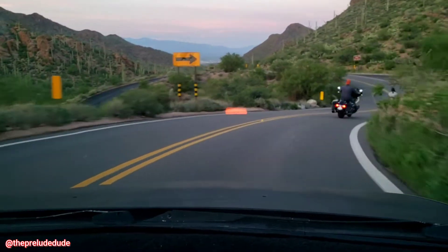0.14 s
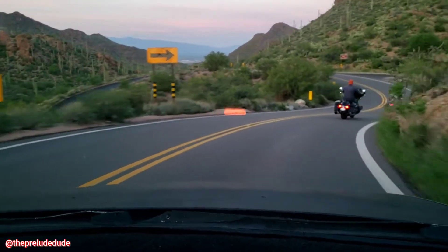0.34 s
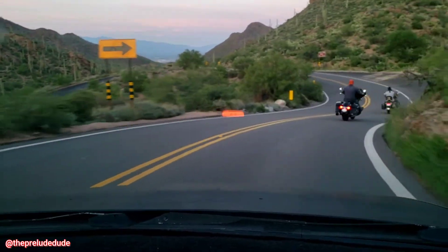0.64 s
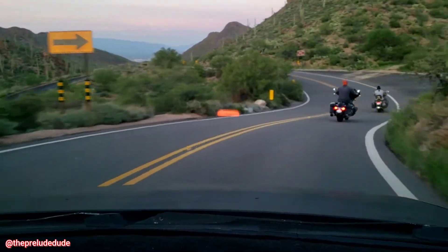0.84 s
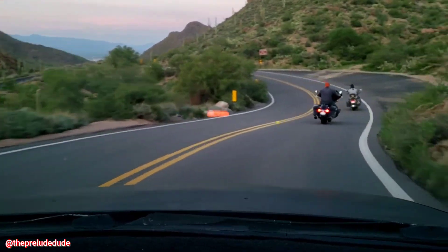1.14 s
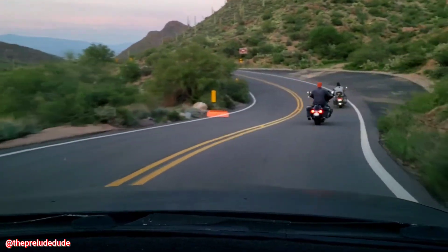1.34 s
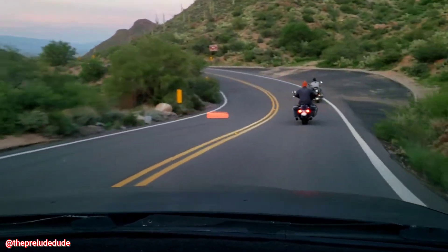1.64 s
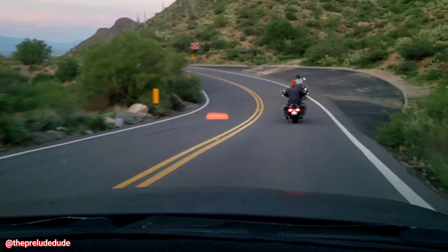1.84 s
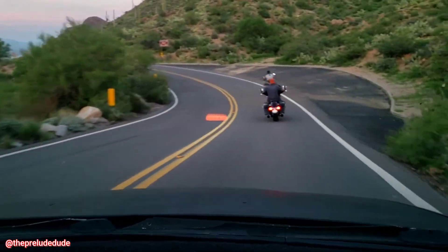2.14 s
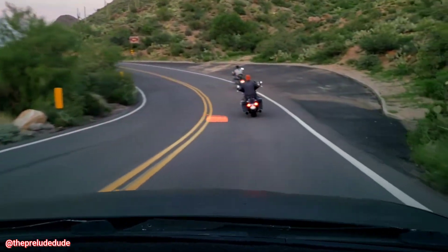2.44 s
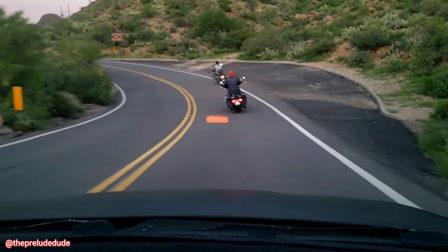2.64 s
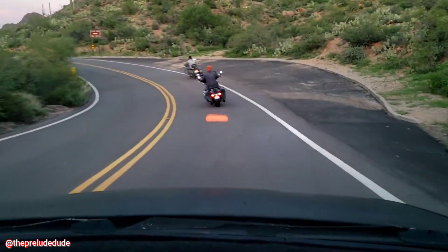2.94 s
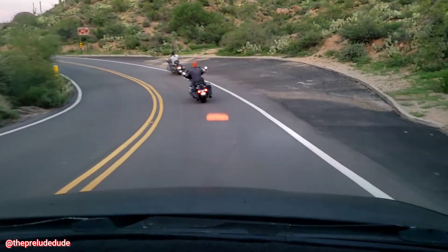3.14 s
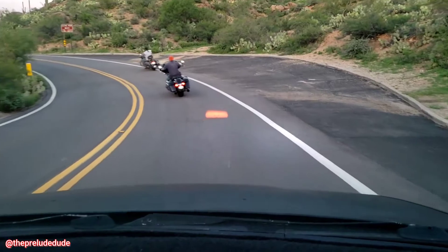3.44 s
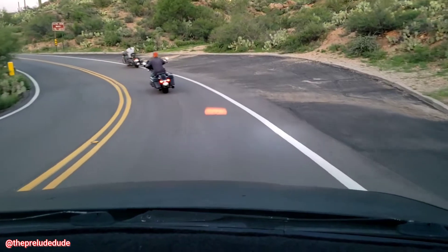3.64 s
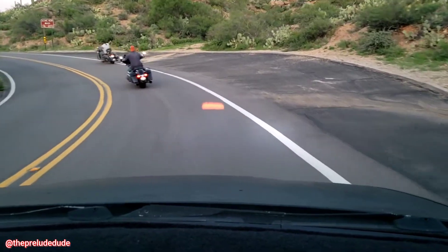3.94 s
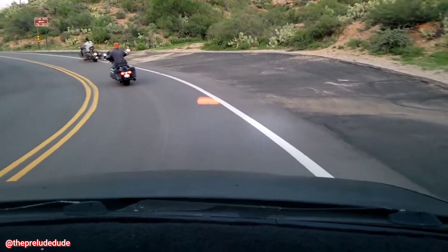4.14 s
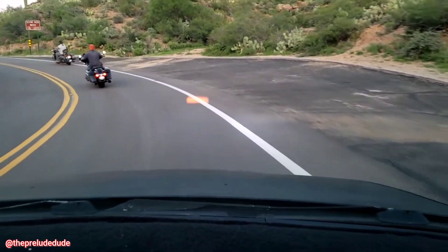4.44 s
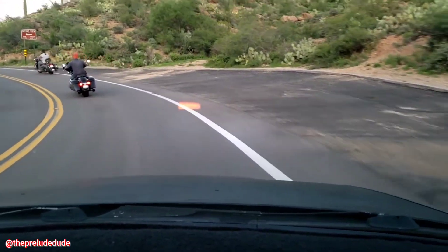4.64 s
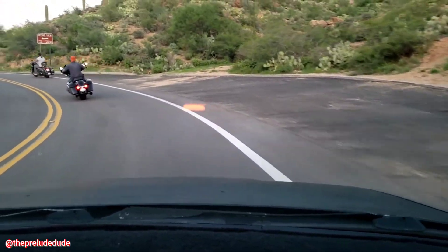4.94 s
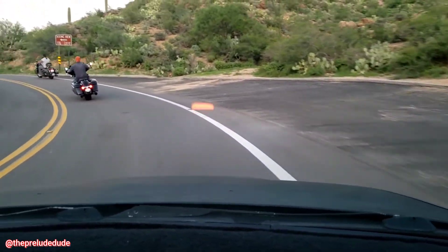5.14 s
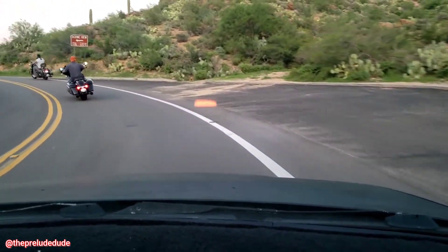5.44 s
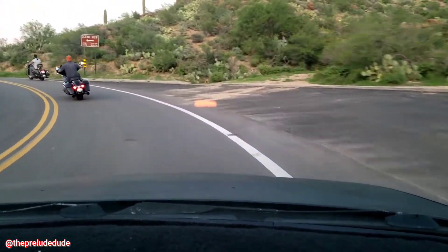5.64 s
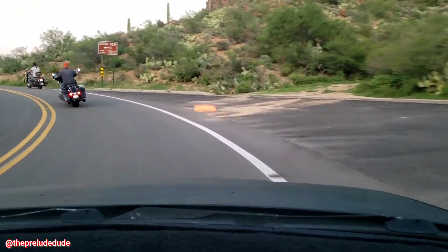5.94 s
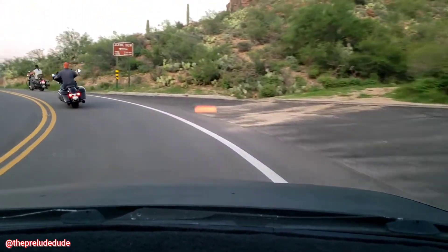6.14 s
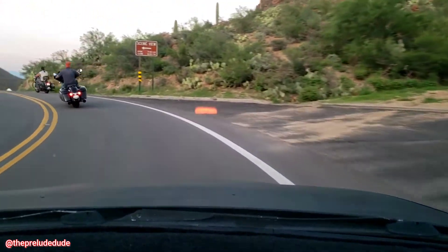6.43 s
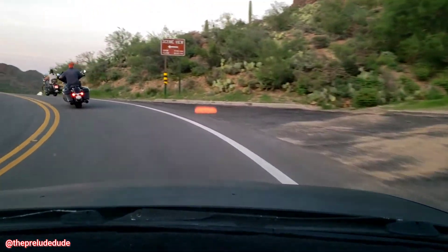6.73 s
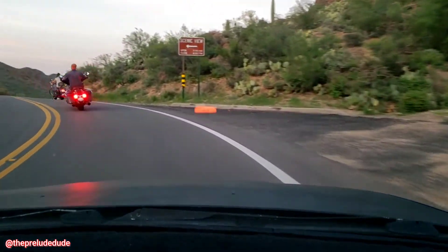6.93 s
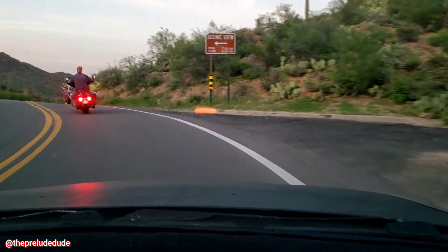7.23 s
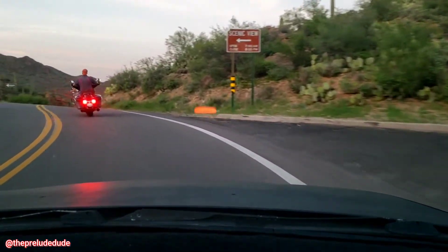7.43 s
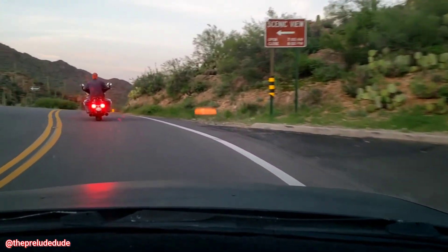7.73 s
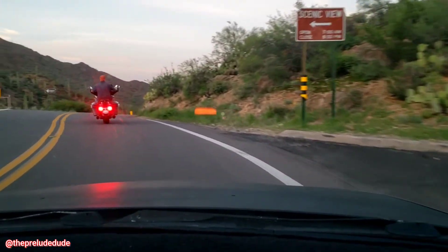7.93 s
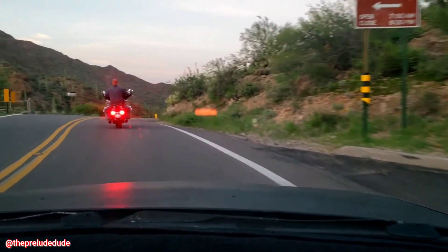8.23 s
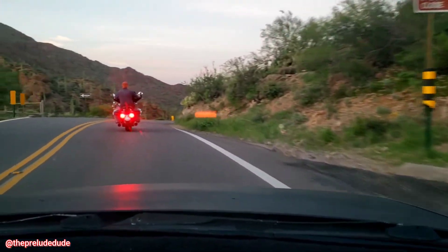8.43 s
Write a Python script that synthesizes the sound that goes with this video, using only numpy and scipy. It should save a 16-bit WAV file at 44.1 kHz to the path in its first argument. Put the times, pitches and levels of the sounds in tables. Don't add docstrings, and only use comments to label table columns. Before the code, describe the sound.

Inside a small car on a winding road, the engine's deep boom sinks in pitch then rises, over tyre rumble, thinning wind hiss and trim ticks.

```python
import sys
import numpy as np
from scipy import signal
from scipy.io import wavfile
from scipy.ndimage import uniform_filter1d, map_coordinates

SR = 44100
rng = np.random.default_rng(int(sys.argv[2]) if len(sys.argv) > 2 else 0)


def boost(x):
    u = np.asarray(x, float) / 20
    return 10 ** u


def wav_out(sig):
    wavfile.write(sys.argv[1], SR, np.round(np.clip(np.atleast_2d(sig).T, -1, 1) * 32767).astype(np.int16))


N = 378372


def curves(table):
    s, *columns = np.transpose(table)
    return [np.interp(np.arange(N) / SR, s, column) for column in columns]


def swells(table):
    t = np.arange(0, N, 32) / SR
    db = 0 * t
    for s, peak_db, length in table:
        db = db + peak_db * np.exp(-((t - s) / length) ** 2)
    return np.interp(np.arange(N) / SR, t, db)


def walk(rate):
    k = int(SR / rate)
    points = rng.standard_normal(N // k + 2)
    line = np.interp(np.arange(N) / k, np.arange(len(points)), points)
    return 1.312 * uniform_filter1d(line, k)


def tone(hz, wobble_hz):
    turns = np.cumsum(hz + wobble_hz * walk(6)) / SR
    return np.sqrt(2) * np.sin(2 * np.pi * (turns + rng.random()))


def band_noise(lo_hz, hi_hz, samples):
    band = signal.butter(2, [lo_hz, hi_hz], "band", fs=SR, output="sos")
    return signal.sosfilt(band, rng.standard_normal(samples))


# (time [s], centre [Hz], level [dB], length
# [s])
HOLLOWS = [(3.55, 14000, -5.5, .2), (3.53, 5500, -1.5, .08), (3.1, 3300, -2, 0.16), (8.42, 5800, -6, .12),
           (8.5, 13500, -8.5, .1), (5.97, 6300, -3, .1), (6.15, 13500, 5, .1), (6.55, 14000, 3, .25),
           (7.2, 16000, -3, .07), (1.37, 2100, 7, 0.11), (4.3, 970, 3, .15), (4.3, 130, 6, .12),
           (3.15, 140, 4.5, .1), (2.2, 310, 2.5, 0.59), (5.4, 305, 5.5, 0.28), (7.85, 200, -3, .08),
           (8.38, 200, -6, .2), (8.4, 160, -4, .12), (7.3, 215, -3, .15), (.12, 52, 6, .1),
           (.95, 36, -5, .25), (3.2, 1800, -3.5, .08), (3.8, 2400, 2.5, .2), (5.3, 290, -4.5, .2),
           (1.75, 210, 4, .2), (2.45, 680, -5, .12), (7.5, 560, 4.5, .12), (7.9, 1500, 3.5, .15),
           (0.54, 5000, 4, 0.13), (7.1, 2300, -2, .2)]


def noise(colour, lo_hz, hi_hz, flicker_db, rate):
    size, overlap, hollow_octaves = 4096, 3072, 0.11
    hz, s, cells = signal.stft(rng.standard_normal(N), SR, nperseg=size, noverlap=overlap)
    hz[0] = 1
    colour_hz, colour_db = np.transpose(colour)
    gain = boost(np.interp(np.log(hz), np.log(colour_hz), colour_db, left=-120, right=-120))
    inside = (hz > lo_hz) & (hz < hi_hz)
    gain /= np.sqrt(2 * np.sum(gain[inside] ** 2) / size)

    grid = np.meshgrid(3 * np.log2(hz), np.minimum(rate * s, 199), indexing="ij")
    db = flicker_db * map_coordinates(rng.standard_normal((50, 200)), grid, order=1)
    for at, centre_hz, hollow_db, length in HOLLOWS:
        octaves = np.log2(hz / centre_hz)[:, None]
        db += hollow_db * np.exp(-(octaves / hollow_octaves) ** 2 - ((s - at) / length) ** 2)
    shaped = cells * gain[:, None] * boost(db)
    return signal.istft(shaped, SR, nperseg=size, noverlap=overlap)[1][:N]


# (time [s], level [dB])
RUSH = [(0, 16.5), (.3, 13), (.66, 11), (.9, 8), (1.35, 6), (1.65, 7.5), (2.1, 5.5), (2.5, 2), (3.05, 0),
        (3.57, -2.5), (4.1, -1.5), (4.6, -1.5), (5.9, 1), (6.3, 1), (6.85, 4.5), (7.3, 4), (7.8, 0.5),
        (8.55, -4)]


def rush(db, share):
    return boost(db + share * curves(RUSH)[0])


# (time [s], level [dB])
CHIRPS = [(4.392, -74), (4.468, -78), (4.706, -72), (4.745, -75), (4.784, -76), (5.072, -72), (5.116, -69),
          (5.152, -73), (5.406, -74), (5.442, -71), (5.481, -68), (5.714, -62), (5.753, -62), (5.792, -65)]


def cricket():
    stroke_s, wing_hz, drop_hz = 0.023, 5000, 330
    x = np.arange(int(stroke_s * SR)) / (stroke_s * SR)
    turns = np.cumsum(wing_hz - drop_hz * x ** 3) / SR
    note = np.sin(np.pi * x) * np.sin(2 * np.pi * turns)
    out = np.zeros(N)
    for s, db in CHIRPS:
        out[int(s * SR):][:len(x)] += boost(db) * note
    return out


# (time [s], firing cycle rate [Hz], level [dB])
BIKE = [
    (1.4, 14, -71),
    (2, 13.2, -61.5),
    (3, 11.4, -59),
    (3.5, 10.7, -57.5),
    (4, 12.6, -57.5),
    (4.4, 12, -52.5),
    (5, 11.65, -51),
    (5.4, 11.1, -51),
    (5.7, 11, -55),
]
BIKE_PARTIALS = {13: -5.5, 15: 0, 18.3: -2.5, 20: -0.4, 30: -12.5, 35: -5}


def motorbike():
    cycle_hz, level_db = curves(BIKE)
    out = np.zeros(N)
    for order, partial_db in BIKE_PARTIALS.items():
        fading = boost(level_db + partial_db + 0.95 * walk(1.4))
        out += fading * tone(order * cycle_hz, wobble_hz=.4)
    return out


# (time [s], peak [dB], low edge #
# [Hz], high edge [Hz])
CLICKS = [(.683, -58, 700, 3000), (1.93, -57, 700, 9000), (3.208, -62.5, 3900, 4700),
          (3.773, -64, 3500, 11500), (4.029, -60, 1800, 5500), (6.203, -62, 700, 3000),
          (6.364, -63, 700, 3000), (7.786, -59.5, 1800, 8500), (7.792, -64, 4000, 6500),
          (.03, -51, 1860, 1950), (5.135, -67, 3500, 7000), (5.188, -66, 4500, 7000),
          (5.238, -68, 5700, 6500), (6.515, -67, 2997, 8000), (6.548, -62, 2000, 6000),
          (6.81, -61, 2000, 7100), (7.147, -60, 2000, 6000), (3.205, -50, 1000, 1700)]


def tick_clicks():
    out, t = np.zeros(N), np.arange(4096) / SR
    for s, db, lo_hz, hi_hz in CLICKS:
        burst = band_noise(lo_hz, hi_hz, len(t))
        decay_s = 0.0037 + 3.6 / (hi_hz - lo_hz)
        shape = np.exp(-t / decay_s) * np.minimum(t / .0005, 1)
        part = out[int(s * SR):][:len(t)]
        part += (boost(db) * burst / burst.std() * shape)[:len(part)]
    return out


# (time [s], peak [dB], ring [Hz], tail [s])
TICKS = [(.683, -60, 1500, .03), (1.93, -62, 2500, .03), (2.75, -70, 12000, 0.027),
         (3.204, -47, 1490, 0.065), (3.206, -56, 2000, .06), (3.213, -62, 3900, .06),
         (3.207, -62, 4200, 0.072), (3.209, -65, 5000, 0.036), (3.24, -64, 4000, .05),
         (3.205, -54, 2500, .05), (3.222, -60, 3750, 0.065), (3.21, -66, 6800, .06),
         (3.208, -67, 8000, 0.08), (1.569, -51, 2700, .03), (3.773, -61.5, 8000, 0.026),
         (4.027, -66, 4000, 0.027), (4.104, -69, 14700, .02), (4.268, -66, 12880, .035),
         (4.345, -71, 12600, .02), (4.42, -63, 12390, .035), (4.421, -65, 13500, .02),
         (4.493, -64, 13500, 0.03), (4.548, -69, 13230, .02), (4.568, -63, 12560, .025),
         (4.772, -59, 9580, 0.024), (4.827, -62, 4220, .03), (4.846, -62, 3800, .05),
         (4.85, -68, 10000, 0.018), (4.939, -62, 4500, 0.06), (5.133, -60, 4284, .04),
         (5.186, -63, 4100, .06), (6.203, -60, 1790, 0.028), (6.364, -60, 1790, 0.023),
         (6.551, -64, 4770, 0.037), (6.684, -54, 4600, 0.039), (6.686, -58, 2500, .05),
         (6.685, -60, 8980, 0.035), (6.81, -58, 4000, 0.063), (6.687, -59, 3550, .05),
         (7.148, -62, 4510, .04), (7.24, -57, 3020, 0.068), (7.355, -58, 2970, .05),
         (7.785, -64, 6500, 0.031), (7.818, -59, 5110, .03), (8.118, -66.5, 8000, 0.048),
         (7.786, -59, 2500, 0.027), (7.791, -51, 3950, 0.025), (7.797, -61, 3700, 0.044)]


def trim():
    out, t = np.zeros(N), np.arange(4096) / SR
    grit_per_s, grit_db, grit_tail_s = 14, -72, .025
    when, size, pitch = rng.random((int(grit_per_s * N / SR), 3)).T
    tails = np.full(len(when), grit_tail_s)
    grit = np.transpose([when * N / SR, grit_db + 7 * size ** 2, 1800 * 7 ** pitch, tails])

    for s, db, hz, tail in [*TICKS, *grit]:
        half_width = min(.11 * hz, 700)
        crack = band_noise(hz - half_width, hz + half_width, len(t))
        tick = 0.81 * crack / crack.std() + 0.37 * np.sin(2 * np.pi * hz * t)
        snap = band_noise(.5 * hz, min(2 * hz, .45 * SR), len(t))
        tick += 1.5 * np.exp(-t / .003) * snap
        fade = np.exp(-np.log(1000) * t / tail) * np.minimum(t / 0.0033, 1)
        part = out[int(s * SR):][:len(t)]
        part += (boost(db) * tick * fade)[:len(part)]

    squeak_s, squeak_hz, squeak_db, length_s = 3.408, 6700, -77, .042
    stick_slip_db = 4 * np.cos(2 * np.pi * 38 * (t - .01))
    arch = np.sin(np.pi * np.clip(t / length_s, 0, 1)) ** .5
    squeak = boost(squeak_db + stick_slip_db) * np.sin(2 * np.pi * squeak_hz * t) * arch
    out[int(squeak_s * SR):][:len(t)] += squeak
    return out


# (frequency [Hz], density [dB per Hz])
ROAR = [(120, -11), (200, -6), (260, 7), (310, 4.5), (410, 2.5), (480, -2.5), (600, -2.5), (700, -7.5),
        (920, -9.5), (1000, -14.5), (1500, -15.5), (2000, -21.5), (2300, -34.5), (3500, -37.5)]
WIND = [(900, -3.5), (1500, -2), (2100, -2.5), (2500, -4), (3200, -7.5), (3450, -6.5), (3620, -5),
        (3800, -8), (4100, -7.5), (4400, -10.5), (5100, -11.5), (5600, -15.5), (7000, -18.5), (9000, -23)]
HIGH_HISS = [(5000, -16.5), (7000, -6.5), (7500, -1.5), (10000, -1), (12400, -2.5), (13200, -9), (14500, -31)]
TOP_HISS = [(11000, -23.5), (12600, -7), (13200, 2), (15400, 3.5), (15900, 1.5)]
# (time [s], level [dB], length [s])
PUFFS = [
    (.31, -1, 0.034),
    (2.073, -1.5, .15),
    (2.76, 6, 0.089),
    (3.4, 1, .1),
    (3.6, -2.5, 0.13),
    (3.9, 0.5, 0.083),
    (6.3, 4, 0.13),
    (6.9, 2, 0.18),
    (7.284, 4, 0.13),
    (8.5, 0, 0.12),
]
# (time [s], level [dB], length [s])
LULLS = [
    (.95, 0, 0.12),
    (3.0, -1, 0.086),
    (3.45, -2.5, 0.14),
    (5.15, 2, .1),
    (5.4, -1.5, .07),
    (7.0, -2.5, 0.061),
    (7.5, 0, .1),
    (8.05, 1, 0.095),
    (8.4, -2, 0.12),
]


def roar_and_wind():
    gust = boost(.6 * walk(16) + .25 * walk(7))
    puff_db, lull_db = swells(PUFFS), swells(LULLS)
    roar = noise(ROAR, 646, 1500, flicker_db=1.24, rate=7)
    roar *= rush(-57.5, share=.45) * boost(0.37 * walk(7.4) + .6 * lull_db)
    wind = noise(WIND, 2130, 5200, flicker_db=1.17, rate=13)
    wind *= rush(-68.5, share=.85) * boost(lull_db)
    high_hiss = noise(HIGH_HISS, 7500, 12000, flicker_db=2.0, rate=12)
    high_hiss *= rush(-75, share=.9) * boost(.4 * puff_db)
    top_hiss = noise(TOP_HISS, 13000, 15300, flicker_db=1.5, rate=14)
    top_hiss *= rush(-81.5, share=.8) * boost(puff_db)
    return roar + gust * (wind + high_hiss + top_hiss)


# (time [s], firing rate [Hz])
FIRING = [(0, 89.6), (.2, 88), (.68, 84.7), (1.16, 79.8), (1.64, 76), (2.12, 71.7), (2.59, 67.9),
          (2.85, 66.8), (3.31, 67.6), (3.79, 68.7), (4.27, 70.3), (5.23, 74.1), (5.95, 75.5), (6.66, 75.6),
          (7.38, 73), (7.86, 70.2), (8.58, 65.5)]
# (time [s], load [dB], growl of the upper overtones [dB])
LOAD = [(0, 0, -37.5), (.3, 2.5, -33.5), (.65, -2, -35.5), (.95, -4, -38.5), (1.6, -1.5, -39.5),
        (2.05, -1.5, -47.5), (2.4, 1, -46), (2.95, 1, -50), (3.3, 1, -47), (3.97, 0.5, -47),
        (4.07, -3.5, -50), (4.33, -3.5, -48.5), (4.45, -7.5, -57), (5.3, -7.5, -68), (6.45, -5.5, -47.5),
        (6.95, 0.5, -41.5), (7.3, -1, -58), (8.58, 1.5, -52)]
# (time [s], level [dB], length [s])
BEATS = [(0.035, -11, 0.011), (0.09, 0, 0.0068), (0.923, -4, 0.017), (1.068, -5.3, 0.012),
         (1.088, 4.5, 0.023), (1.232, -14.0, 0.019), (1.282, 1.5, 0.031), (1.312, -9.3, 0.017),
         (1.362, 3, 0.026), (1.442, 5, 0.012), (1.492, 5, 0.012), (1.571, 2, 0.019), (1.691, -2, 0.015),
         (1.831, 1, 0.033), (1.896, -9, 0.013), (4.061, -1.5, 0.012), (4.255, 3.5, 0.025),
         (4.405, -2, 0.03), (4.844, -8, 0.018), (4.909, 1.5, 0.036), (5.039, -6, 0.025), (5.123, 3, 0.023),
         (5.198, 1, 0.039), (5.318, -6, 0.031), (5.383, 1.5, 0.035), (5.443, 1, 0.027), (5.493, 3, 0.018),
         (5.532, -9.9, 0.014), (5.577, 3, 0.025), (5.607, -3, 0.017), (5.682, 5, 0.022),
         (5.717, -7.0, 0.019), (5.747, 6, 0.025), (5.872, -10.3, 0.034), (5.907, 7.5, 0.021),
         (5.932, -4, 0.012), (5.961, 0, 0.034), (6.016, 2.5, 0.029), (6.076, -17, 0.01), (6.101, 8, 0.021),
         (6.131, -20, 0.013), (6.156, 5, 0.024), (6.196, -4, 0.014), (6.221, 4, 0.026),
         (6.296, -3.5, 0.032), (6.395, -5.6, 0.011), (6.415, 7.5, 0.02), (6.44, -8, 0.018),
         (6.545, -5, 0.011), (6.765, -6, 0.013), (6.824, 3, 0.04), (6.864, -8.2, 0.017),
         (6.929, -10, 0.011), (7.034, -8, 0.013), (7.064, 2.5, 0.049), (7.433, 4.5, 0.031)]
# (time [s], level [dB], length [s])
SOFT_BEATS = [(0.16, 0.5, 0.012), (0.183, -3.9, 0.015), (0.23, -5.5, 0.029), (0.29, -0.5, 0.04),
              (0.354, -4, 0.011), (0.376, 1.5, 0.04), (0.43, 2.5, 0.013), (0.504, 0, 0.016), (0.698, 2, 0.04),
              (0.865, 6.5, 0.04), (0.973, 2, 0.012), (0.988, 2.5, 0.018), (1.01, -3.0, 0.012),
              (1.033, 4, 0.021), (1.14, 2, 0.013), (1.192, 0, 0.026), (1.537, -3.2, 0.028), (1.62, -2, 0.029),
              (1.925, 2.5, 0.015), (2.068, -1.5, 0.04), (2.13, -3, 0.014), (2.165, 2.5, 0.04),
              (3.133, 1.5, 0.021), (3.283, -1.2, 0.03), (3.525, -1, 0.025), (3.903, 2, 0.032),
              (3.981, 2, 0.018), (4.012, -4, 0.0081), (4.32, 3.0, 0.014), (4.494, 1, 0.013),
              (4.575, 1.5, 0.038), (4.749, 0.5, 0.033), (4.809, 1.8, 0.014), (5.086, 2, 0.012),
              (5.258, 0, 0.02), (6.49, 1, 0.012), (6.602, -5, 0.014), (6.632, -0.5, 0.012), (6.69, 0.5, 0.028),
              (6.959, 2, 0.011), (7.007, 0.5, 0.018), (7.149, 2.4, 0.017), (7.204, -1.5, 0.025),
              (7.229, 2.5, 0.022), (7.26, -2, 0.039), (7.333, 3.5, 0.02), (7.366, -1.5, 0.03),
              (7.464, -2.8, 0.02), (7.579, -2.0, 0.017), (7.675, -3, 0.017), (7.707, 0.5, 0.025),
              (7.837, -2.3, 0.018), (7.897, -7, 0.0059), (7.947, -1.9, 0.011), (7.993, 0.5, 0.022),
              (8.04, 1, 0.04), (8.378, 2, 0.039), (8.523, -1, 0.0096)]
# (frequency [Hz], density [dB per Hz])
FLOOR_PAN = [(20, -24), (30, -18), (42, -7.5), (55, 0), (70, -10.5), (90, 1.5), (102, -10.5), (120, -15),
             (150, -10), (195, -27), (260, -18.5), (330, -31), (450, -51)]
# (frequency [Hz], width [Hz], rms level [dB])
PAN_MODES = [
    (39, 4.7, -53),
    (56.16, 5.8, -45),
    (66.6, 5.5, -57),
    (88.1, 8.2, -42),
]


def tyres():
    drum_share, rough_db, rough_from_s, rise_s = 0.21, 4, 5.5, 0.95
    road_db = rough_db / 2 * np.tanh((np.arange(N) / SR - rough_from_s) / rise_s)
    road_db += 0.34 * swells(BEATS + SOFT_BEATS)
    drum = rush(-43, drum_share) * noise(FLOOR_PAN, 25, 57, flicker_db=2.0, rate=4.1)
    for hz, width, db in PAN_MODES:
        panel = signal.iirpeak(hz, hz / width, SR)
        ring = signal.lfilter(*panel, rng.standard_normal(N))
        ring = signal.lfilter(*panel, ring)
        drum += rush(db, drum_share) * ring / ring.std()

    cruise_hz = 70.14
    air_hz = 257.2 + 1.02 * (curves(FIRING)[0] - cruise_hz)
    air_db = -47 + 1.2 * curves(LOAD)[0] + 1.3 * walk(7.8)
    return boost(road_db) * drum + boost(air_db) * tone(air_hz, wobble_hz=.4)


# (frequency [Hz], rms level [dB])
BOOM = [
    (65, -23.5),
    (68.5, -19.5),
    (72, -21),
    (76, -25.5),
    (82, -30),
    (84.3, -19),
    (87, -23.5),
    (90, -29.5),
]
# (frequency [Hz], width [Hz], level [dB])
CABIN = [(142, 24, -6.5), (163.4, 18.4, 4), (239.3, 40, -3), (281, 24, -3.5), (307.5, 14, -5.5),
         (327, 59, -10), (403.3, 48, -8.5), (458, 8.5, -17), (505, 82, -15.5), (612, 25, -12),
         (558, 42, -18.5), (428, 17, -15.5), (880, 270, -24)]
ORDER_DB = {4: -3, 5: -4, 6: 3.5, 7: 0, 8: -1, 9: -9.5, 10: -4.5}
# (time [s], level [dB], length [s])
FLARES = [
    (.2, 2, .06),
    (.6, 4.5, 0.056),
    (.95, -1, .12),
    (1.22, 3.5, 0.053),
    (1.6, 5.5, 0.06),
    (2.12, 6.5, 0.049),
]
# (multiple of the firing rate, time [s], level [dB], length
# [s])
ORDER_SWELLS = [(7, 0.11, -11, .18), (7, .47, -5, 0.034), (6, 0.495, -7, .04), (6, 0.042, 3, 0.056),
                (6, .97, -13, 0.092), (7, 1.25, 0, 0.11), (4, 1.55, -8.5, .3), (5, 1.5, 6, .2),
                (9, 0.45, 6, 0.13), (9, 2, 8, .3), (10, 0.14, 6, .12), (10, 1.2, -6, .25), (6, 2.09, 5.5, .2),
                (7, 2.1, -8, .25), (7, 3.35, 9.5, 0.24), (2.5, 3.4, -5.5, .4), (2, 1.33, -2.5, .12),
                (2, 1.75, 2.5, .2), (3, 1.75, 3, .2), (5, .55, 2.5, .12), (4, 0.63, 2.5, 0.16), (2, 4.3, 5, .12),
                (2, 5.6, -5.5, .2), (3, 0.51, 6.5, 0.068), (3.5, .1, -10, 0.17), (6, 3.18, 6, 0.074),
                (6, 3.45, -5.5, .12), (6, 4.6, 1.5, .15), (6, 3.7, 1, .2), (8, 2.5, 6.5, .1), (7, 1.7, -8, 0.11),
                (6, 8.3, 5.5, .12), (2, 6.9, 4.5, .1), (2, 5.3, 5, 0.1), (2, 10, 4, .07), (2, 8.2, 10.5, 0.11),
                (3, 7.4, -8, 0.66), (4, 6.7, 2, 0.24), (6, 7.4, -5, 0.96)]


def engine():
    firing_hz = curves(FIRING)[0]
    load_db, growl_db = curves(LOAD)
    growl_db = growl_db + swells(FLARES)
    lower_db = -34.5 - 0.85 * np.abs(firing_hz - 83.45) + .4 * load_db

    turns = np.cumsum(firing_hz * (1 + 0.003526 * walk(12))) / SR
    turns += .25 - turns[-1]
    boom_db = np.interp(firing_hz, *np.transpose(BOOM)) + load_db
    boom_db += swells(BEATS + SOFT_BEATS) + .2 * walk(15)
    out = boost(boom_db) * np.sin(2 * np.pi * turns)

    scale_hz = np.arange(1000)
    power = np.zeros(len(scale_hz))
    for hz, width, db in CABIN:
        power += boost(2 * db) / (1 + (2 * (scale_hz - hz) / width) ** 2) ** 2
    cabin = np.sqrt(power)

    half_order_db = -14.5
    for order in np.arange(3, 21) / 2:
        upper = order > 3
        db = growl_db if upper else lower_db
        db = db + (half_order_db if order % 1 else ORDER_DB.get(order, 0))
        db = db + swells([row[1:] for row in ORDER_SWELLS if row[0] == order])
        db += 1.6 * walk(9) + 1.2 * walk(24) if upper else .8 * walk(5)
        phase = order * turns + 0.038 * upper * walk(15) + rng.random()
        out += boost(db) * np.interp(order * firing_hz, scale_hz, cabin) * np.sin(2 * np.pi * phase)
    return np.sqrt(2) * out


# (delay [s], gain [ratio])
GLASS_ECHOES = [
    (.0066, 0.12),
    (.0113, 0.029),
    (.0021, 0.013),
]


def scene():
    bright = cricket() + tick_clicks() + trim() + roar_and_wind()
    echoes = np.zeros(N)
    for delay, gain in GLASS_ECHOES:
        echoes += gain * np.roll(bright, int(delay * SR))
    mix = motorbike() + bright + echoes + tyres() + engine()
    return mix[None]


def band_limit(x):
    return signal.sosfilt(signal.butter(12, 16180, fs=SR, output="sos"), x)


def record(dry):
    top_cut = signal.ellip(14, .3, 60, 15480, fs=SR, output="sos")
    mix = signal.sosfilt(top_cut, dry)
    return band_limit(mix)


dry = scene()
out = record(dry)
wav_out(out)
```